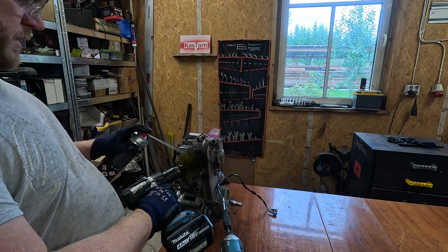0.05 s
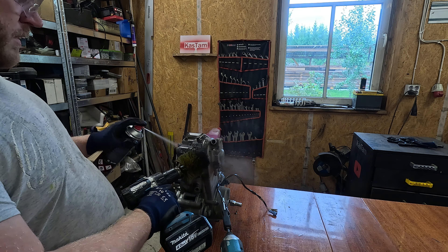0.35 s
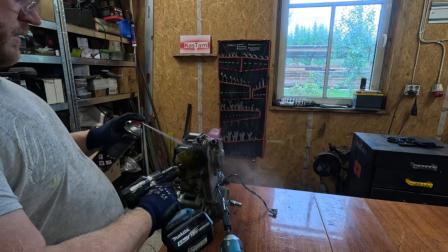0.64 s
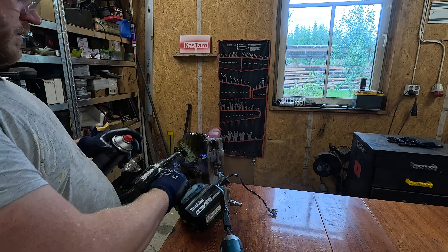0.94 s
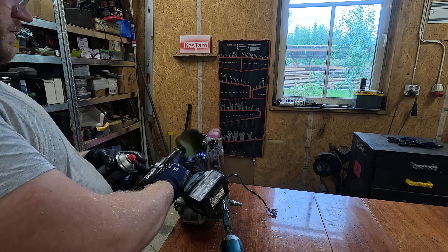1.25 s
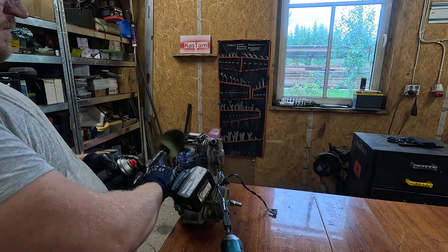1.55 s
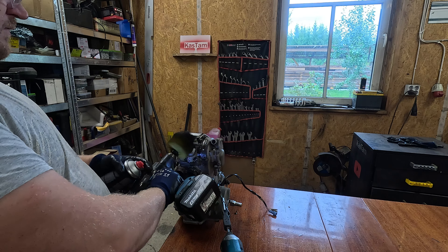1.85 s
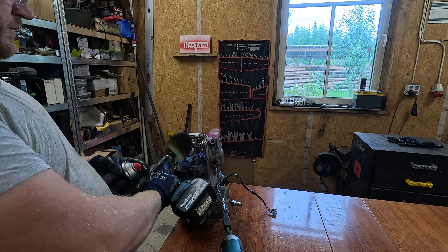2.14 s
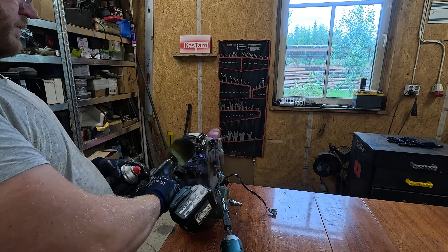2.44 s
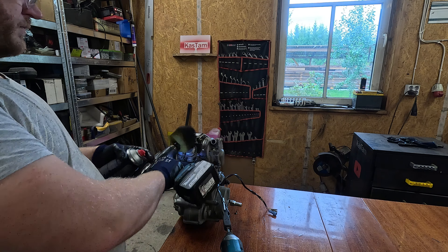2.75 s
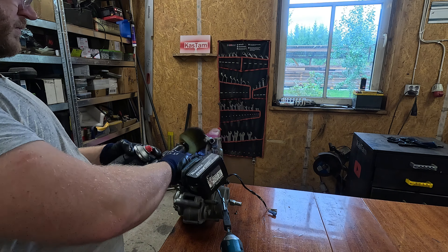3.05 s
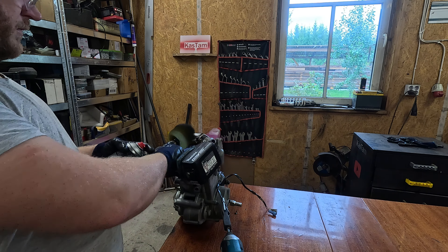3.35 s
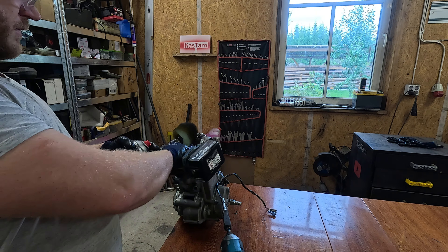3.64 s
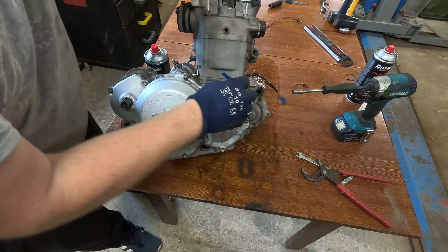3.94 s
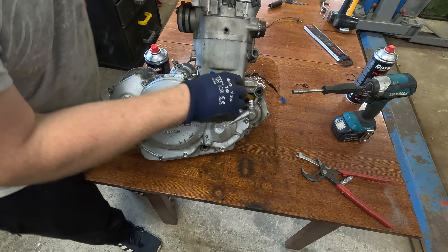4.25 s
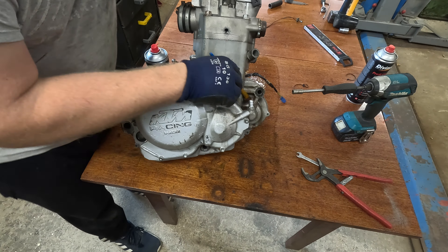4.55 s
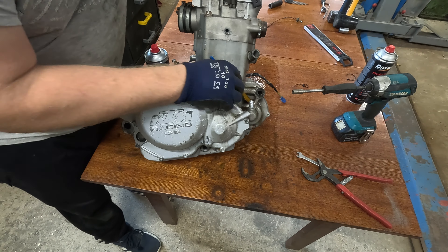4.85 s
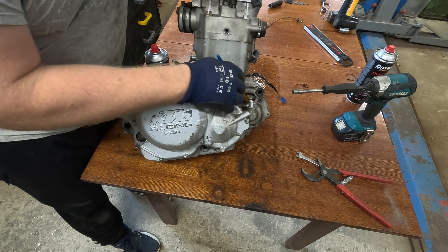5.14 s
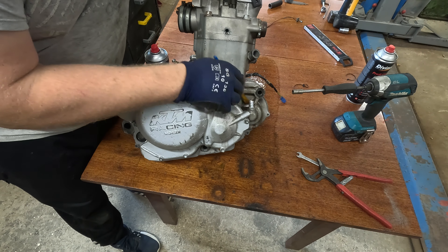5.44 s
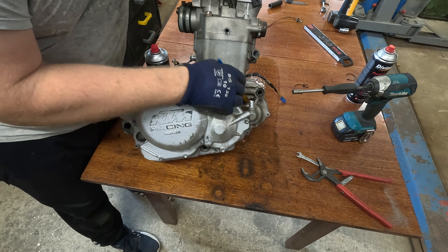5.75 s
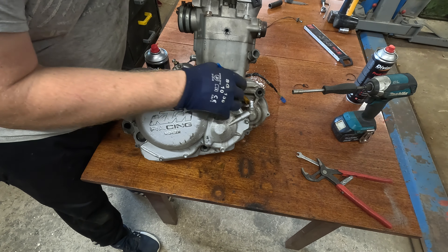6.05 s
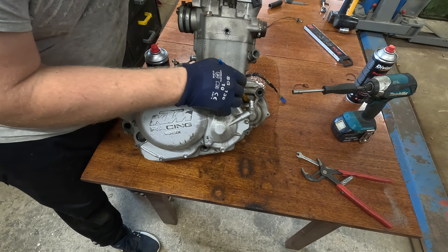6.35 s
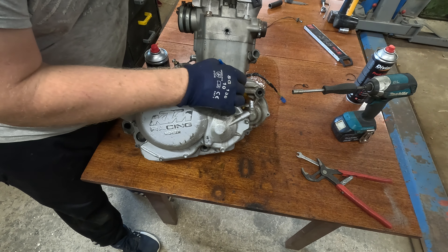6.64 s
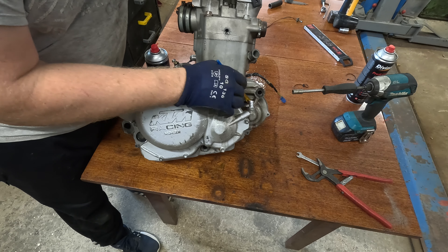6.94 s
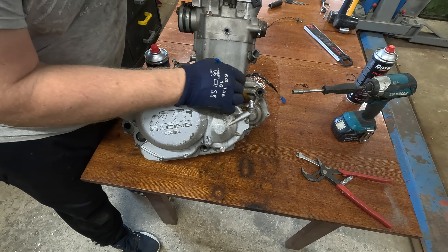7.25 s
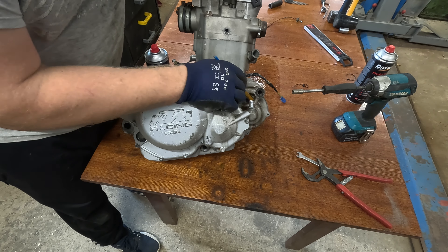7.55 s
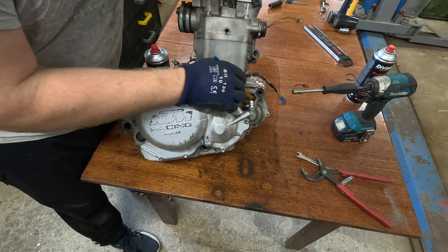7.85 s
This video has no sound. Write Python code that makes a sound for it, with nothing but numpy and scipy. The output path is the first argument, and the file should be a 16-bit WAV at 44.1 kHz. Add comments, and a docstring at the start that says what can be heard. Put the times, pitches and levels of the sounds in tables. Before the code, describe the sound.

Heard close up in a small workshop, an aerosol sprays for a moment and stops. A cordless drill then hums and whines for about three seconds, its wire brush rasping on an engine part with brief squeals as it catches. The drill stops suddenly halfway through. The rest is quieter: irregular metallic clicks, gritty little scrapes, a glove rubbing the case and a few dull bumps on the bench, over a quiet room rumble.

```python
"""Cleaning an engine in a small wooden workshop

A spray can hisses onto an engine, then a cordless drill spins a round wire brush on the metal:
its motor hums, its gears whine, its speed controller whistles and the wire tips rasp.
The drill cuts off abruptly, and a gloved hand works at the engine case with sharp clicks,
short scrapes and wiping. A quiet, low rumble lies under it all."""
import sys
import numpy as np
from scipy import signal
from scipy.fft import rfft, irfft, next_fast_len
from scipy.io import wavfile
from scipy.ndimage import map_coordinates

SR = 44100
rng = np.random.default_rng(int(sys.argv[2]) if len(sys.argv) > 2 else 0)


def unload_wav(signal):
    """Save mono or channel-first audio to the path in sys.argv[1] as 16-bit WAV at rate SR, clipped to [-1, 1]."""
    wavfile.write(
        sys.argv[1],
        SR,
        np.round(np.clip(np.atleast_2d(signal).T, -1, 1) * 32767).astype(np.int16),
    )


N = 356769
T = np.arange(N) / SR
TRIGGER_S, BITE_S, STOP_S = 1.076, 1.116, 3.951  # drill starts, brush bites, both cut off
CRUISE_HZ = 955  # the motor's pitch at working speed
LEFT_RIGHT = np.array([[1], [-1]])  # adds on the left, subtracts on the right


def gain(db):
    """Turn decibels into a number to multiply by."""
    return 10 ** (np.asarray(db) / 20)


def normalise(x):
    """Scale a signal to an average strength (rms) of 1."""
    return x / np.sqrt(np.mean(x ** 2))


def curve(table):
    """Join (time, value) points with straight lines, giving a value for every sample."""
    return np.interp(T, *np.transpose(table))


def between(start, end):
    """Switch on at start and off at end, with 4 ms fades."""
    return np.clip((T - start) / .004, 0, 1) * np.clip((end - T) / .004, 0, 1)


def swell(centre, length):
    """A smooth, bell-shaped rise and fall."""
    return np.exp(-2 * ((T - centre) / length) ** 2)


def strokes(rows):
    """A loudness curve in which each (start, length, level) row rises, holds and dies away."""
    attack_s, release_s = 0.015, 0.0097
    return sum(gain(db) * np.clip((T - start) / attack_s, 0, 1)
               * np.exp(-np.maximum(T - start - length, 0) / release_s) for start, length, db in rows)


def colour(x, points):
    """Shape the tone of x with (frequency, level) points, fading out beyond both ends; rms 1."""
    hz, db = np.transpose(points)
    size = next_fast_len(N)
    f = np.maximum(np.arange(size // 2 + 1) * SR / size, 1)
    shape = gain(np.interp(np.log(f), np.log(hz), db))
    ends = np.minimum(f / hz[0], 1) ** 2 * np.minimum(hz[-1] / f, 1) ** 2
    return normalise(irfft(rfft(x, size) * shape * ends, size)[:N])


def noise(points):
    """Steady noise with the given tone colour."""
    return colour(rng.standard_normal(N), points)


def wander(rate):
    """A random drift of size about 1 that heads for a new value rate times a second."""
    steps = rng.standard_normal(N // 20)
    return normalise(np.interp(T * rate, np.arange(len(steps)), steps))


def grains(per_s, spread_db):
    """Tiny hits at random moments, a few much bigger than the rest."""
    sizes = gain(spread_db * np.minimum(rng.exponential(size=N), 5))
    return (rng.random(N) < per_s / SR) * sizes * rng.standard_normal(N)


def angle(hz):
    """The angle reached by something that turns hz times a second."""
    return 2 * np.pi * np.cumsum(hz) / SR


def filtered(x, order, hz, kind):
    """Keep the "low", "high" or "band" part of a sound; a higher order cuts more steeply."""
    return signal.sosfilt(signal.butter(order, hz, kind, fs=SR, output="sos"), x)


# Tone colours of the room's hush, rumble and drone: (frequency [Hz], level [dB])
HUSH_COLOUR = [(20, -22), (33, -8.5), (60, -14.5), (90, -12), (150, -10.5), (300, -17), (700, -19),
               (1500, -20.5), (4000, -29), (9000, -23.5), (15000, -45.5)]
ROOM_RUMBLE_COLOUR = [(18, 3), (26, -1.5), (34, 11.5), (46, -1), (70, -11.5), (110, -18.5), (180, -34.5)]
DRONE_COLOUR = [(52, -36.5), (58, -1.5), (62, 5), (68, -17.5), (120, -27.5)]
# How the rumble rises and falls: (time [s], relative level [dB])
ROOM_RUMBLE_LEVEL = [(0, -71.5), (1.2, -66.5), (3.2, -65.5), (3.8, -67.5), (4.8, -63.5), (5.2, -53.5),
                     (5.55, -64.5), (6.95, -59.5), (7.15, -59), (8.09, -54.5)]
def background():
    """The room's quiet hush, with a low rumble and a drone that both waver."""
    hush, hush_side = noise(HUSH_COLOUR), noise(HUSH_COLOUR)
    swell_db, throb_db = 2.8 * wander(9), 2.8 * wander(9)
    rumble = noise(ROOM_RUMBLE_COLOUR) * gain(curve(ROOM_RUMBLE_LEVEL) + 1.5 + swell_db)
    drone = noise(DRONE_COLOUR) * gain(np.where(T < STOP_S, -64.5, -70.5) + throb_db)
    return rumble + drone + gain(-70.5) * hush + gain(-74.5) * hush_side * LEFT_RIGHT


# Tone colour of the spray's hiss: (frequency [Hz], level [dB])
SPRAY_COLOUR = [(120, -32.5), (250, -11.5), (420, -15), (750, -11), (1250, -3), (1900, -5.5), (2500, -3.5),
                (3100, -6.5), (4400, -4.5), (6200, 1), (7400, 0), (8000, -5), (9300, -7), (10600, -10),
                (12000, -16), (14200, -16), (15500, -38)]
# Where the jet rings on the metal:
# (frequency [Hz], width [Hz], relative level at first [dB], relative level at last [dB])
SPRAY_PEAKS = [(1240, 410, -11.5, -29), (5700, 790, -10.5, -16.5), (6240, 140, -8, -15.5),
               (7050, 1000, -7, -8.5), (8900, 600, -9.5, -5.5), (9540, 370, -10, -10.5),
               (12000, 510, -17.5, -14)]
# Loudness of the spray: (time [s], level [dB])
SPRAY_LEVEL = [(0.0, -31.5), (0.164, -33.5), (0.592, -32), (0.726, -34), (0.74, -33.5)]
def spray():
    """The jet sputters until the valve shuts; its ringing drifts as the can sweeps over the metal."""
    shut_s, fall_db_per_s = 0.75, 400
    hiss = colour(grains(24000, 0.64), SPRAY_COLOUR) * gain(-3 + .5 * wander(37.6))
    for hz, width, first_db, last_db in SPRAY_PEAKS:
        band = noise([(hz - 2 * width, -35), (hz - width / 2, -3), (hz, 0),
                      (hz + width / 2, -3), (hz + 2 * width, -35)])
        position = np.cumsum(1 + .032 * wander(4))  # reading at an uneven speed bends the pitch
        band = map_coordinates(band, [position], mode="mirror")
        sweep_db = np.interp(T, [0, shut_s], [first_db, last_db])
        hiss += band * gain(sweep_db - 2.5 + 1.5 * wander(9))
    fall_db = fall_db_per_s * np.clip(T - shut_s, 0, 1)
    return hiss * gain(curve(SPRAY_LEVEL) - 0.06 - fall_db)


# Bumps on the bench: (start [s], length [s], level [dB])
BENCH_BUMPS = [(.76, 0.2, -63), (4.16, 0.051, -68), (4.45, .06, -62.5), (5.12, .05, -58),
               (5.24, 0.037, -65), (5.35, .06, -56), (6.38, .05, -62.5), (6.8, 0.141, -67.5),
               (7.82, .04, -57)]
# Their deep tone colour: (frequency [Hz], level [dB])
BENCH_COLOUR = [(55, 6), (85, 5), (130, -10), (220, -19)]
def bumps():
    """Handling things on the bench makes dull bumps."""
    return noise(BENCH_COLOUR) * strokes(BENCH_BUMPS)


# Small dribbling ticks: (time [s], level [dB])
DRIBBLE_TICKS = [(.835, -45), (.945, -56), (.988, -68), (1.034, -72), (1.077, -57), (1.089, -46)]
def ticks():
    """Faint ticks as the last of the spray dribbles from the can."""
    taps = sum(gain(db) * (T > s) * np.exp(-np.abs(T - s) / 0.0067) for s, db in DRIBBLE_TICKS)
    return taps * noise([(900, -15), (2500, 5.5), (5000, -3), (8000, -0.5), (12000, -29)])


def wavering_tone(hz, waver_hz, flutter_db):
    """One tone that wavers in pitch and flutters in loudness; rms 1."""
    tone = np.sin(angle(hz + waver_hz * wander(2 * waver_hz)))
    return normalise(tone * gain(flutter_db * wander(34.85)))


# How the drill's body boosts or weakens each pitch: (frequency [Hz], level change [dB])
DRILL_BODY = [(480, -5.5), (610, 1.5), (740, -11.5), (810, -10.5), (850, 0.5), (895, 1.5), (940, 1.5),
              (990, 0), (1060, 2), (1120, -1), (1500, 10.5), (1980, 2.5), (2200, 4), (2950, 7), (3100, -2),
              (3210, 6.5), (3320, 2), (3415, 5.5), (3490, -1), (3570, -4.5), (3800, -9.5), (4150, -4),
              (4550, -4), (4800, -2), (5400, -8.5), (6600, -0.5)]
def shaft_tones(motor_hz, table, flutter_db):
    """Tones that follow the motor, shaped by the drill's body; loose gear teeth make them waver."""
    out = 0
    for multiple, db, waver_hz in table:
        hz = multiple * motor_hz
        body_db = np.interp(hz, *np.transpose(DRILL_BODY))
        out += gain(db + body_db) * wavering_tone(hz, waver_hz, flutter_db)
    return out


# Tones of the motor: (multiple of motor pitch, relative level [dB], waver [Hz])
HUM_TONES = [(1, 2.6, 5), (.605, -11, 6), (1.25, -12, 20), (2, -10.5, 25)]
def motor(motor_hz):
    """The brushless motor hums, growing louder as it gets up to working speed."""
    spin_up = np.minimum(motor_hz / CRUISE_HZ, 1) ** 3
    return gain(-43.5) * shaft_tones(motor_hz, HUM_TONES, flutter_db=1.3) * spin_up


# Tones of free-running gears, of gears pushed sideways, and of the bearings:
# (multiple of motor pitch, relative level [dB], waver [Hz])
WHINE_TONES = [(4, 1, 12), (5, -2, 55), (7.882, -3.5, 45)]
GROWL_TONES = [(2.667, -1.5, 16), (2.78, -3.5, 30), (5.42, 3, 55), (5.75, 1, 75)]
BEARING_TONES = [(5.05, -14, 70.2), (5.75, -12, 89.65), (7.599, -18.5, 92.5)]
# Brief squeals as the brush catches:
# (centre [s], length [s], multiple of motor pitch, waver [Hz], level [dB])
CATCH_SQUEALS = [(1.21, .04, 5.4, 120, -38), (1.285, .08, 3.8, 70, -35.5), (1.3, .12, 7.1, 130, -38),
                 (1.43, .1, 4, 50, -41), (1.54, .24, 5.65, 120, -36.5), (1.65, 0.074, 4, 35, -37.5),
                 (1.67, 0.065, 2.667, 25, -35), (1.86, .18, .605, 6, -46), (1.987, 0.1, 2.667, 16.7, -40),
                 (2.026, .15, 5.75, 80, -36), (2.2, .2, 5.42, 70, -39), (3.11, .08, 5.42, 40, -37),
                 (3.11, .1, .605, 6, -48), (3.43, .08, 2.667, 18, -38.5), (3.504, .07, 4, 14, -38),
                 (3.507, .06, 7.85, 70, -33), (3.694, 0.07, 5.42, 25, -35), (3.82, .13, 5.54, 26, -38),
                 (3.87, .09, 4, 14, -37), (3.86, .09, 2.667, 16, -39.5)]
def gears(motor_hz, pressure_db, load_db):
    """Gears whine and bearings squeal; pressing on the brush turns the whine into a growl."""
    flutter_db = 1.7 + .1 * load_db
    whine = gain(-38.5 - 0.14 * load_db + wander(12)) * shaft_tones(motor_hz, WHINE_TONES, flutter_db)
    growl = gain(-48 + 0.36 * pressure_db) * shaft_tones(motor_hz, GROWL_TONES, flutter_db)
    bearings = gain(-23.5) * shaft_tones(motor_hz, BEARING_TONES, flutter_db=3.4)
    squeals = sum(gain(db) * swell(s, length) * wavering_tone(multiple * motor_hz, waver_hz, 1.7)
                  for s, length, multiple, waver_hz, db in CATCH_SQUEALS)
    spin_up = np.clip((T - TRIGGER_S) / 0.33, 0, 1) ** 2
    inside = (whine + growl + bearings) * spin_up + squeals
    return filtered(inside, 10, 6900, "low")  # the plastic housing holds back the highest tones


PULSES_PER_TURN = 30  # motor pulses for one turn of the brush
def chatter(motor_hz, load_db):
    """Pressed hard, the brush bounces about once a turn and shakes the gears' loudness."""
    bounce = np.sin(angle(motor_hz / PULSES_PER_TURN * (1 + .2 * wander(20)))) + .5 * wander(140)
    depth = .045 * load_db
    return (1 + depth * bounce) / np.sqrt(1 + depth ** 2)


# Loudness of the whistle's upper tone: (time [s], level [dB])
UPPER_WHISTLE_LEVEL = [(1.1, -43), (1.25, -47), (1.31, -41), (1.55, -43), (1.7, -54), (1.96, -54),
                       (2.02, -40), (2.33, -46), (2.55, -41), (2.7, -42), (2.78, -48), (2.86, -39.5),
                       (3.06, -38), (3.14, -44), (3.3, -46), (3.42, -40), (3.66, -43), (3.76, -52)]
def whistle(motor_hz, load_db):
    """The controller's rapid switching makes a pair of tones that move apart as the motor speeds up."""
    switching_hz, rise_s = 7908, 0.06
    switching, spin = 2 * np.pi * switching_hz * T, angle(motor_hz)
    upper_db = curve(UPPER_WHISTLE_LEVEL) + 1.2 * wander(25)
    fade_db = 2 * np.maximum(motor_hz - CRUISE_HZ, 0) + 0.53 * load_db
    lower_db = -39 - fade_db + 2.5 * wander(14)
    pair = gain(upper_db) * np.sin(switching + spin) + gain(lower_db) * np.sin(switching - spin)
    centre = gain(-61) * np.sin(switching)
    near_octave = gain(-79.5) * np.sin(2 * switching - 2 / 3 * spin)
    return (pair + centre + near_octave) * np.clip((T - TRIGGER_S) / rise_s, 0, 1)


# The drill's speed, heard as pitch: (time [s], motor pitch [Hz])
MOTOR_PITCH = [(1.085, 20), (1.18, 500), (1.27, 780), (1.42, 1050), (1.5, 1125), (1.58, 1158), (1.65, 1112),
               (1.75, 1005), (1.92, 986), (2.12, 911), (2.32, 872), (2.58, 906), (2.72, 905), (2.83, 857),
               (2.98, 852), (3.1, 806), (3.2, 783), (3.27, 796), (3.35, 872), (3.42, 900), (3.5, 832),
               (3.6, 809), (3.78, 745), (3.87, 737), (3.95, 748)]
# How hard the brush is pressed on the metal: (time [s], pressure [dB])
BRUSH_PRESSURE = [(1.12, -11), (1.37, -6), (1.58, -2.5), (1.7, 2.5), (2.0, -2), (2.45, -7), (2.75, -0.5),
                  (3.3, 1), (3.43, 6), (3.6, 3.5), (3.8, 10.5)]
def drill():
    """Hum, gears and whistle all follow the motor's speed, which wobbles more under load."""
    pressure_db = curve(BRUSH_PRESSURE)
    load_db = np.maximum(pressure_db, 0)
    motor_hz = curve(MOTOR_PITCH) * (1 + (.0025 + .0001 * load_db) * wander(25))
    hum = motor(motor_hz)
    gearbox = gears(motor_hz, pressure_db, load_db) * chatter(motor_hz, load_db)
    return (hum + gearbox + whistle(motor_hz, load_db)) * between(TRIGGER_S, STOP_S)


# Tone colours of the wires' bright rasp and low rumble: (frequency [Hz], level [dB])
WIRE_RASP_COLOUR = [(180, -46.5), (300, -17.5), (439, -15.5), (600, -7.5), (781, -10.5), (892, -6.5),
                    (1260, -4.5), (3340, 0.5), (3810, -1), (4280, 0), (6460, 3.5), (8280, -9),
                    (8990, -10.5), (9450, -14.5), (15500, -40)]
WIRE_RUMBLE_COLOUR = [(55, -3), (85, -0.5), (125, -4), (190, 1), (300, -7), (440, -5.5), (650, -3.5)]
def brush():
    """Thousands of wire tips flick the metal; speed raises the rasp, pressure raises the rumble."""
    motor_hz = curve(MOTOR_PITCH)
    uneven_db = 0.17 * np.sin(angle(motor_hz / PULSES_PER_TURN)) + 0.76 * wander(60)
    speed_gain = np.clip(motor_hz / CRUISE_HZ, .2, 1.05) ** 0.6
    rasp = colour(grains(16000, 1.1), WIRE_RASP_COLOUR) * gain(-28.5 + uneven_db) * speed_gain
    rumble = colour(grains(1500, 2.7), WIRE_RUMBLE_COLOUR) * gain(-55.5 + curve(BRUSH_PRESSURE))
    # the wires only graze at first, then the gears take up their slack with a clack
    grip = gain(-12) * between(TRIGGER_S, BITE_S) + between(BITE_S, STOP_S)
    clack = gain(-31) * noise([(200, -10), (900, 4.5), (3500, 6), (8000, -6), (15000, -29)])
    clack *= np.exp(-np.abs(T - BITE_S) / 0.014) * (T > BITE_S)
    return (rasp + rumble) * grip + clack


# Wiping strokes: (start [s], length [s], relative rub level [dB], relative swish level [dB])
WIPES = [(4.107, 0.018, -53, -74), (4.232, 0.048, -53.5, -67), (4.338, 0.076, -57.5, -70),
         (4.463, 0.13, -62, -74), (4.57, 0.15, -61.5, -67), (4.766, 0.031, -58, -61),
         (4.881, 0.074, -57.5, -63), (5.11, 0.17, -56.5, -62.5), (5.312, 0.12, -52.5, -63),
         (5.485, 0.24, -63, -67.5), (5.777, 0.13, -60, -68), (5.944, 0.15, -58, -72),
         (6.19, 0.062, -52, -57), (6.442, 0.16, -64.5, -67.5), (6.716, 0.1, -80, -62.5),
         (7.03, 0.076, -69, -67), (7.349, 0.034, -50.5, -60), (7.534, 0.1, -61.5, -62.5),
         (7.789, 0.068, -69, -59.5), (7.901, 0.023, -82, -57), (8.013, 0.036, -65, -58.5)]
# Short, gritty scrapes: (centre [s], length [s], relative level [dB])
GLOVE_SCRAPES = [(4.13, .015, -53), (4.288, .018, -53), (4.888, 0.016, -52), (5.632, 0.014, -56),
                 (4.483, 0.029, -48.5), (4.686, 0.025, -49.5), (5.388, 0.032, -43), (6.02, 0.027, -52.5),
                 (6.222, 0.04, -50), (6.932, 0.016, -47), (7.37, .014, -64.5), (7.833, 0.016, -47.5)]
# Tone colours of the rub, the fabric's swish and the scrapes: (frequency [Hz], level [dB])
GLOVE_RUB_COLOUR = [(300, -12), (880, -20), (1080, 9), (1200, 3.5), (1320, 6), (1470, 10), (1750, 6.5),
                    (2350, 2), (2900, 9.5), (3250, 1), (3600, 0.5), (4800, 2), (7000, -3), (12000, -65)]
FABRIC_COLOUR = [(2000, -35), (3500, -8), (6000, 2.5), (8000, 4.5), (9800, -1.5), (11000, -12),
                 (15000, -21)]
GLOVE_SCRAPE_COLOUR = [(350, -13), (700, -3.5), (1200, 7.5), (1700, 3), (3000, 1), (5000, -7),
                       (10000, -15.5)]
# Moments when the glove lifts between strokes: (time [s])
GLOVE_LIFTS = [4.2, 4.57, 4.85, 5.73, 5.93, 6.32]
def glove():
    """The glove rubs the case, its fabric swishes, and it scrapes as it sticks and slips."""
    grains_per_s, grit_db, ease_off_s = 2600, 2, 6.95
    # the resting glove still rubs lightly, until the hand eases off
    resting = gain(-22 * (T > ease_off_s) + 0.46 * wander(18))
    rubbing = strokes((s, length, db) for s, length, db, _ in WIPES) + gain(-65.5) * resting
    swishing = strokes((s, length, db) for s, length, _, db in WIPES) + gain(-68.5) * resting
    rubbing *= gain(-3.5 + 5 * np.tanh(wander(51)))  # the grip keeps changing
    swishing *= gain(-4 + 5.5 * np.tanh(wander(45)))
    rub = colour(grains(grains_per_s, grit_db), GLOVE_RUB_COLOUR) * rubbing
    swish = colour(grains(2 * grains_per_s, grit_db), FABRIC_COLOUR) * swishing
    # a brief, scratchy fuzz surrounds each click
    click_fuzz = [(s, 0.012, knock_db - 27) for s, _, knock_db, *_ in CASE_CLICKS]
    bursts = sum(gain(db - 5.5) * swell(s, length) for s, length, db in GLOVE_SCRAPES + click_fuzz)
    scrapes = colour(grains(grains_per_s, grit_db), GLOVE_SCRAPE_COLOUR) * bursts
    lifted = sum(np.exp(-((T - s) / .025) ** 2) for s in GLOVE_LIFTS)
    fade_in = np.clip((T - STOP_S) / 0.051, 0, 1) ** 2
    return (rub + swish + scrapes) * gain(-10 * lifted) * fade_in


def strike(notes, blur):
    """One sharp hit starts all (frequency, ring time, level) notes at once; blur smears their pitch."""
    size, power = 2048, 1e-12
    f = np.maximum(np.fft.rfftfreq(size, 1 / SR), 1)
    for hz, ring_s, db in notes:
        half_width = blur * np.log(1000) / (2 * np.pi * ring_s)
        peak = 1 / (1 + ((f - hz) / half_width) ** 2)
        peak /= 1 + (np.log(f / hz) / .27) ** 4  # a small part gives off little far from its note
        power += gain(db) ** 2 * peak / peak.mean()
    # turn the spectrum into a sound whose energy comes as early as possible (minimum phase)
    cepstrum = irfft(np.log(power) / 2)
    one_sided = np.r_[cepstrum[0], 2 * cepstrum[1:size // 2]]
    return irfft(np.exp(rfft(one_sided, size)))


# Clicks on the engine case, with the relative levels of their parts from low to high:
# (time [s], knock pitch [Hz], knock [dB], ring [dB], snap [dB], tick [dB])
CASE_CLICKS = [(4.0859, 1160, -24, -18, -17.5, -23), (4.24, 1250, -25.5, -16, -16.5, -25),
               (4.366, 1000, -33, -42, -46, -50), (4.3914, 1190, -25.5, -19, -16, -19),
               (4.6117, 1210, -26, -26, -30, -37), (4.6157, 1230, -21, -20, -27, -41),
               (4.995, 1160, -29, -19, -32, -34), (5.1008, 1230, -19, -20, -49, -44),
               (5.35, 1200, -25, -17, -25, -38), (5.391, 1220, -26, -14, -18, -31),
               (5.441, 1560, -24, -6, -11.5, -22), (5.5513, 1550, -23.5, -10.5, -16.5, -45),
               (5.765, 1560, -19.5, -22.5, -44, -42), (5.98, 1570, -20.5, -26, -34, -37),
               (6.007, 1500, -27, -27, -35, -40), (6.107, 1540, -25, -11.5, -14, -18.5),
               (6.3445, 1490, -29, -17, -18.5, -25), (6.57, 1500, -43, -40, -35, -27),
               (6.6014, 1550, -32, -14, -16, -22), (6.686, 1450, -22, -20, -38, -30),
               (6.893, 1500, -32, -25, -38, -48), (6.915, 1500, -31, -26, -31, -44),
               (7.0125, 1560, -24, -11.5, -12, -13.5), (7.3656, 1510, -26.5, -27, -26, -33),
               (7.511, 1400, -31.5, -30, -38, -41), (7.587, 1290, -25.5, -20, -24, -32),
               (7.638, 1400, -44, -39, -37, -32), (7.7524, 1420, -29, -30.5, -32, -27),
               (7.825, 1090, -20.5, -33, -45, -35), (8.052, 1300, -36.5, -32, -39, -38)]
# Notes the case rings at: (frequency [Hz], time to fade by 60 dB [s], relative level [dB])
CASE_NOTES = [(2050, .005, -11), (2950, .007, -3), (3250, .007, -1.5), (3800, .003, -2.5),
              (4400, .0035, -2), (4950, .005, -1.5), (7600, .004, -1), (9300, .003, -9)]
def clicks():
    """The struck spot knocks and the case rings; gives the sound sent ahead and that sent all round."""
    knock_ring_s, echo_s = 0.01, .0034
    out = np.zeros((2, N + SR))
    for s, knock_hz, knock_db, *part_db in CASE_CLICKS:
        notes = [(knock_hz, knock_ring_s, knock_db)]
        for hz, ring_s, db in CASE_NOTES:
            detune, damping = rng.standard_normal(2)  # the glove shifts and damps each note anew
            part = np.digitize(hz, [3500, 6000])  # ring, snap or tick
            notes.append((hz * (1 + .025 * detune), ring_s * gain(2 * damping), db + part_db[part]))
        click = np.array([strike(notes, blur=1), strike(notes, blur=3.5)])
        start = int(s * SR)
        out[:, start:start + click.shape[1]] += click
    bench_echo = gain(-13) * np.roll(out, int(echo_s * SR), axis=1)
    return gain(-3.5) * (out + bench_echo)[:, :N]


def room(x, echo_db, pan_db, side_db, treble_db, smear_db, all_round=None):
    """Add the short echo of the wooden walls, whose panels soak up the bass."""
    middle_fade_s, treble_fade_s = 0.56, 0.2  # time to fade by 60 dB
    t = T[:SR * 3 // 5]
    centre, side = rng.standard_normal((2, len(t)))
    reflections = centre + gain(side_db) * side * LEFT_RIGHT
    middle = filtered(reflections, 2, [350, 5000], "band") * gain(-60 * t / middle_fade_s)
    treble = filtered(reflections, 2, 5000, "high") * gain(-60 * t / treble_fade_s)
    tail = (middle - gain(treble_db) * treble) * np.minimum(t / 0.0083, 1)
    tail *= gain(echo_db) / np.sqrt(np.sum(tail ** 2) / 2)
    # the very highest treble is slightly smeared and differs between left and right
    smear = filtered(rng.standard_normal((2, len(t))), 4, 10000, "high") * np.exp(-t / .008)
    tail += gain(smear_db) * smear / np.sqrt(np.sum(smear ** 2) / 2)
    to_walls = x if all_round is None else all_round
    echo = signal.fftconvolve(to_walls[None], tail, axes=1)[:, :N]
    heard = (x + echo) / np.sqrt(1 + gain(echo_db) ** 2)
    return heard * gain(pan_db * LEFT_RIGHT / 2)


def scene():
    """Spraying, then brushing that cuts off along with its echo; the hand work follows."""
    tools = spray() + ticks() + drill() + brush()
    cleaning = room(tools, echo_db=-10.5, pan_db=1.55, side_db=-6, treble_db=-5, smear_db=-5)
    ahead, all_round = clicks()
    clicking = room(ahead, echo_db=-13, pan_db=-.2, side_db=-7, treble_db=-4.5, smear_db=-9,
                    all_round=all_round)
    hand = room(glove() + bumps(), echo_db=-11.5, pan_db=0, side_db=-4.5, treble_db=-11.5, smear_db=-16)
    return cleaning * between(-1, STOP_S) + clicking + hand + background()


# How far the left side runs ahead of the right, negative for late: (frequency [Hz], phase [radians])
LEFT_LEAD = [(0, -0.24), (2840, -0.74), (9910, -0.094), (12200, -1.06), (14000, -0.5), (15300, -0.016)]
def record(dry):
    """The left side hears slightly late, and the highest treble is cut steeply."""
    top_hz = 15600
    size = next_fast_len(N + SR // 10)
    lead = np.interp(np.arange(size // 2 + 1) * SR / size, *np.transpose(LEFT_LEAD))
    stereo = irfft(rfft(dry, size) * np.exp(.5j * lead * LEFT_RIGHT), size)[:, :N]
    return signal.sosfilt(signal.ellip(10, .1, 70, top_hz, fs=SR, output="sos"), stereo)


dry = scene()
out = record(dry)
unload_wav(out)
```